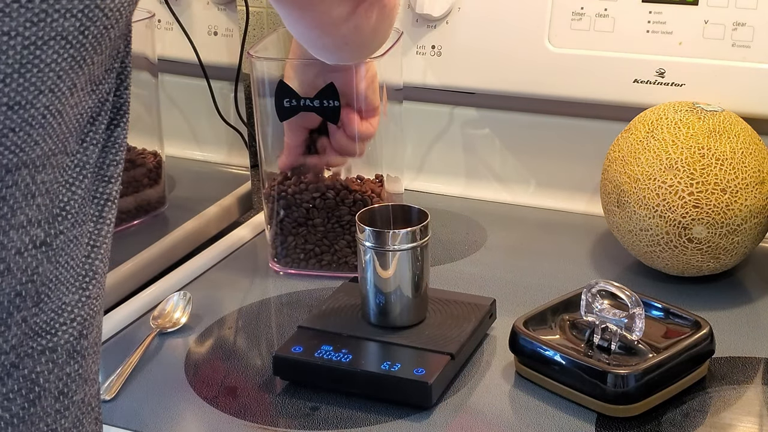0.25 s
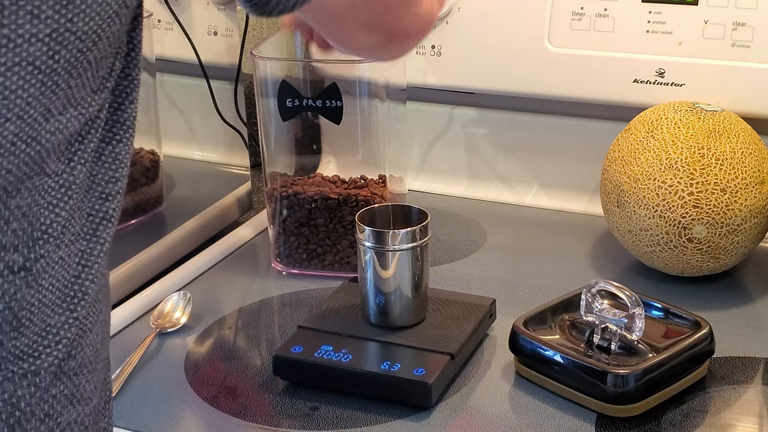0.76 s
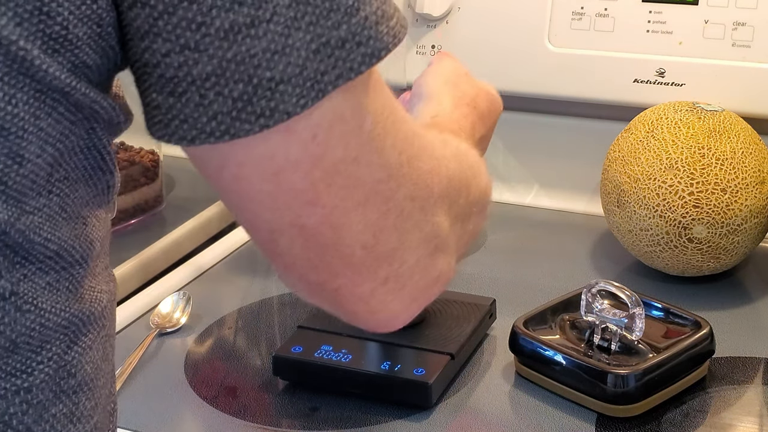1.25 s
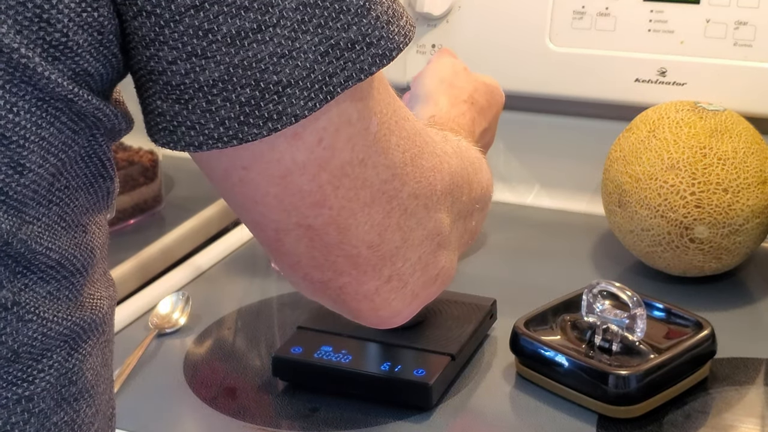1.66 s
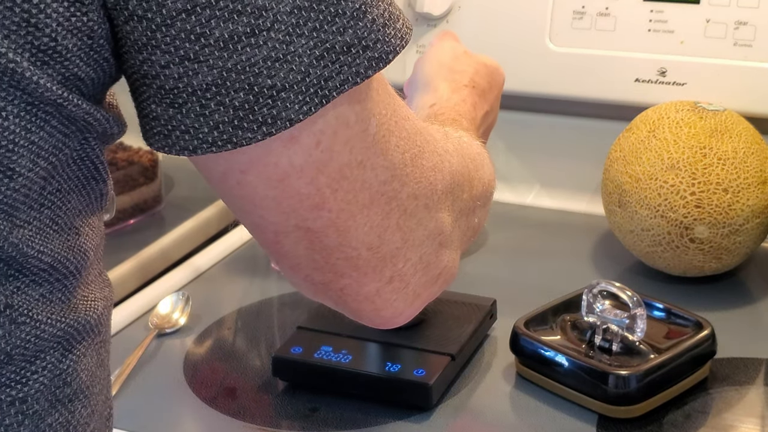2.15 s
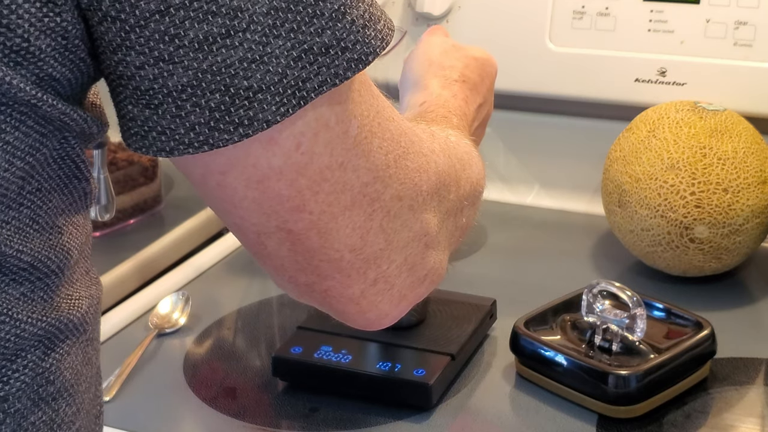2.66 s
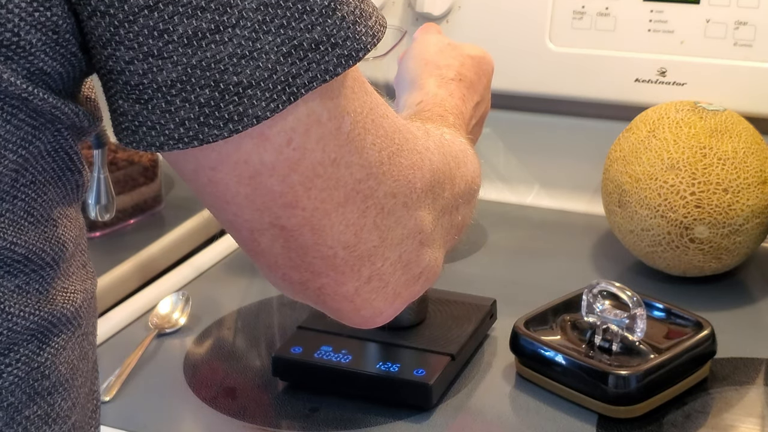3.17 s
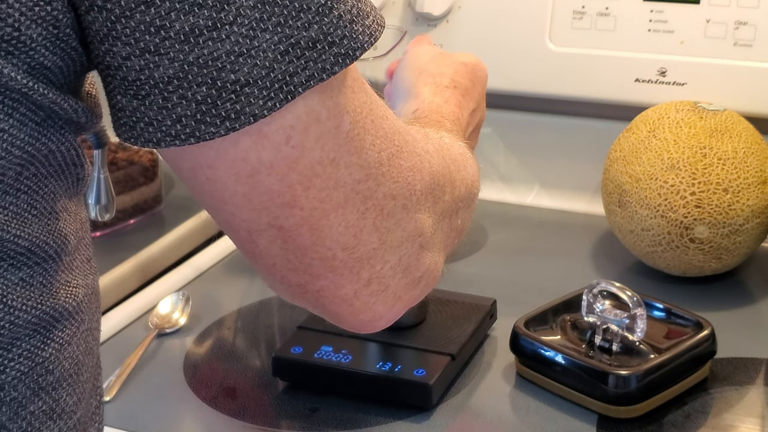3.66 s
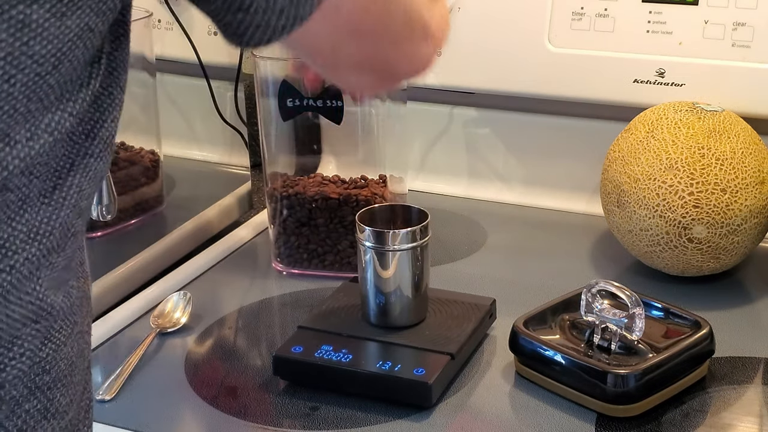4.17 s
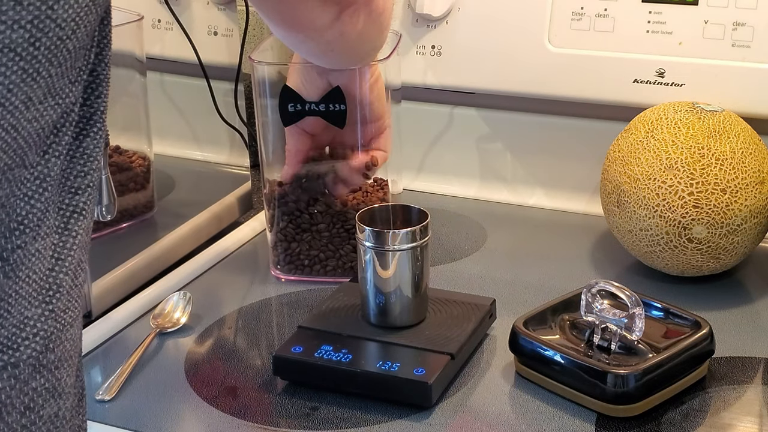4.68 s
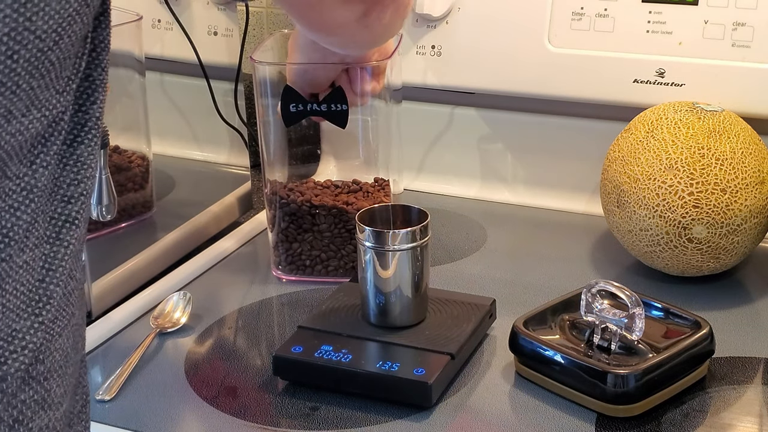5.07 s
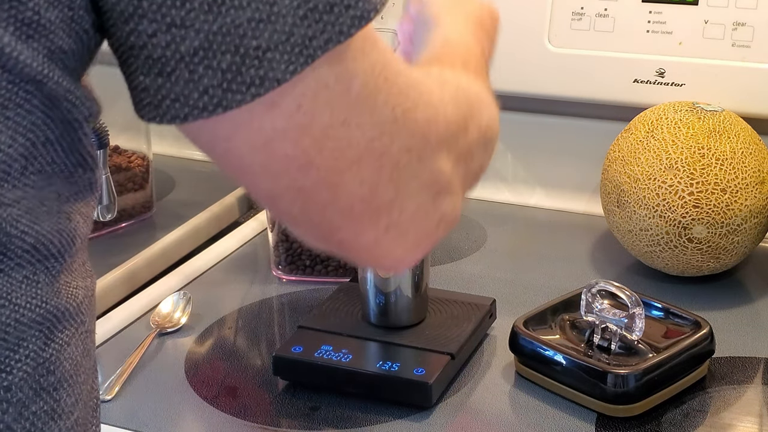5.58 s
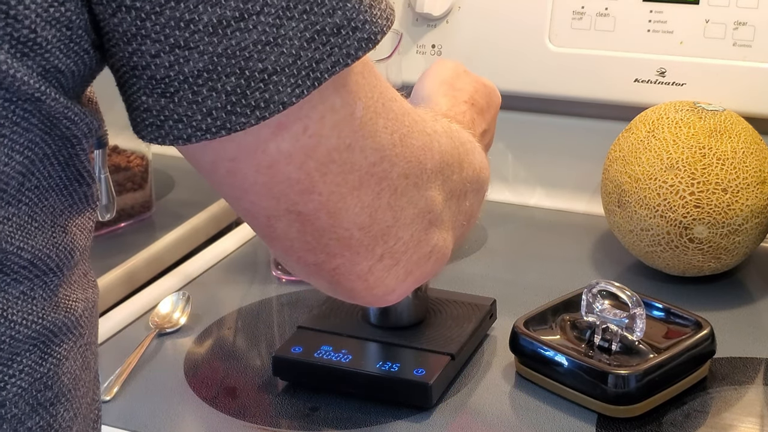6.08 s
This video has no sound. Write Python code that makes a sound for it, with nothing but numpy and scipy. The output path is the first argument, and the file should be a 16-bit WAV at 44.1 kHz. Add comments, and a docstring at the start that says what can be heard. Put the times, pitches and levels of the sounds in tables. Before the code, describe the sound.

Coffee beans are scooped with a crackly rustle, dropped rattling into a metal cup, then scooped again, above a steady low appliance hum.

```python
"""Coffee beans from jar to cup

A hand digs beans out of a plastic jar (dense random contacts) and lets them trickle into a steel cup,
where each ticks and bounces (noise cracks, rebounds, ringing modes).
Going back for more it bumps the jar, digs again and drops a last few beans.
The small hard kitchen answers every contact with noise tails; an appliance hums over the room's rush."""
import sys
import numpy as np
from scipy import signal
from scipy.fft import rfft, irfft, next_fast_len
from scipy.io import wavfile
from scipy.ndimage import uniform_filter1d, map_coordinates

SR = 44100
rng = np.random.default_rng(int(sys.argv[2]) if len(sys.argv) > 2 else 0)


def to_wav(s):
    """Save 16-bit WAV."""
    ch = np.atleast_2d(s).T  # columns
    pcm = np.round(np.clip(ch, -1, 1) * 32767)  # PCM
    wavfile.write(sys.argv[1], SR, pcm.astype(np.int16))


N = 279153  # length in samples


def amp(db):
    """Decibels to gain."""
    return 10 ** (np.asarray(db) / 20)


def unit(x):
    """Scaled to rms 1."""
    return x / np.sqrt(np.mean(x ** 2) + 1e-20)


def unit_energy(x):
    """Each row scaled to energy 1."""
    return x / np.sqrt(np.sum(x ** 2, axis=-1, keepdims=True) + 1e-20)


def along(points, hz):
    """(Hz, value) points read on a log frequency axis."""
    f, v = np.transpose(points)
    return np.interp(np.log(hz + 1), np.log(f + 1), v)


def envelope(strokes, top_db, grows):
    """Gain of a voice that follows the effort of several strokes, silent between them."""
    t = np.arange(N) / SR
    gain = np.zeros(N)
    for rows in strokes:
        effort_db = np.interp(t, *np.transpose(rows))
        active = (t >= rows[0][0]) & (t <= rows[-1][0])
        gain += amp(top_db + grows * effort_db) * active
    return gain


def wobble(rate):
    """A smooth random curve, rate knots a second."""
    knots = rng.standard_normal(int(N * rate / SR) + 4)
    return map_coordinates(knots, [np.arange(N) * rate / SR])


def filtered(x, gain):
    """x times a gain that depends on frequency."""
    m = next_fast_len(N + SR // 2)
    return irfft(rfft(x, m) * gain(np.fft.rfftfreq(m, 1 / SR)), m)[..., :N]


def above(x, hz, order=3):
    """x without its lows."""
    return signal.sosfilt(signal.butter(order, hz, "highpass", fs=SR, output="sos"), x)


def through(x, response):
    """Each channel of x convolved with an impulse response."""
    response = response.reshape((1,) * (x.ndim - 1) + (-1,))
    return signal.oaconvolve(x, response, axes=-1)[..., :N]


def colour(x, spectrum, size=4096):
    """x through a causal, minimum-phase filter of energy 1 with this spectrum."""
    cepstrum = irfft(np.log(amp(along(spectrum, np.fft.rfftfreq(size, 1 / SR)))))
    fold = np.r_[1, np.full(size // 2 - 1, 2), np.zeros(size // 2)]
    response = irfft(np.exp(rfft(cepstrum * fold)))
    return through(x, unit_energy(response))


def ring(x, modes):
    """The decaying sine modes that x excites; their dB are energies."""
    t = np.arange(SR // 2) / SR
    response = np.zeros(len(t))
    for hz, db, t60 in modes:
        decaying = np.sin(2 * np.pi * hz * t) / 1000 ** (t / t60)
        response += amp(db) * unit_energy(decaying)
    return through(x, response)


def contacts(times, gains, t60, size=384):
    """A tiny decaying noise crack, with its own random colour, at each time."""
    k = np.arange(size)
    decay = np.exp(-np.log(1000) * k / SR / t60)
    cracks = unit_energy(rng.standard_normal((len(times), size)) * decay)
    at = np.maximum(times * SR, 0).astype(int)[:, None] + k
    return np.bincount(at.ravel(), (cracks * gains[:, None]).ravel(), N)[:N]


def series(starts, lengths, rate, scatter_db, count=10):
    """Times and sizes of contacts that follow each start at an uneven rate for its length."""
    k = np.arange(count)
    chance = rng.uniform(-1, 1, (len(starts), 2, count)) * (k > 0)
    times = starts[:, None] + (k + .4 * chance[:, 0]) / rate
    # the last contact of a run may be a fraction of full size
    running = np.clip(np.maximum(lengths, 0)[:, None] * rate + 1 - k, 0, 1)
    return times, running * amp(scatter_db * chance[:, 1])


def bounces(times, flight, keep, count=6):
    """Times and sizes of each landing and its uneven rebounds, which tend to weaken."""
    hops = flight * rng.uniform(.25, 1.75, (len(times), count))
    fading = np.clip(keep, 0, 1).reshape(-1, 1) ** np.arange(count)
    sizes = fading * amp(2 * rng.standard_normal(hops.shape))
    hops[:, 0], sizes[:, 0] = 0, 1
    return times[:, None] + np.cumsum(hops, axis=1), unit_energy(sizes)


def grains(rate, spread_db, t60):
    """Dense bean-on-bean contacts of uneven size in little slips, rms 1 over any longer stretch."""
    count = int(rate * N / SR)
    chance = rng.random((count, 2))
    times = (np.arange(count) + 2 * chance[:, 0]) / rate
    slips = amp(1.64 * wobble(70))
    x = contacts(times, amp(-spread_db * np.sqrt(chance[:, 1])), t60) * slips
    return x / np.sqrt(np.abs(uniform_filter1d(x ** 2, SR // 20)) + 1e-12)


# Stereo width of diffuse sound: pitch_hz [Hz], side_over_mid_db [dB]
WIDTH = [(150, -12), (300, -11), (600, -4), (1200, -0.5), (6800, 0.5), (7800, -12.5), (16000, -13.5)]


def stereo(mid, side):
    """Left and right of a diffuse sound, its width set by frequency."""
    side = filtered(side, lambda hz: amp(along(WIDTH, hz)))
    return np.array([mid + side, mid - side])


# How long the room rings on: pitch_hz [Hz], t60_s [s]
KITCHEN_DECAY = [(100, 0.61), (500, 0.2), (1500, 0.33), (4000, 0.33), (9000, 0.26), (16000, 0.21)]


def kitchen(x, wet_db, gap=0.00014, count=3):
    """Direct sound, then the dense answer of counter, stove and walls, which differs from spot to spot."""
    noise = rng.standard_normal((2 * count, SR // 3))
    hz, t, z = signal.stft(noise, SR, nperseg=256)
    decay = np.exp(-np.log(1000) * t / along(KITCHEN_DECAY, hz)[:, None])
    tails = signal.istft(z * decay, SR, nperseg=256)[1]
    onset = 1 - np.exp(-np.arange(tails.shape[1]) / SR / gap)
    tails = unit_energy(tails * onset)
    spot = np.arange(N) // (SR // 50) % count  # the spots take turns, 20 ms each
    mid, side = (sum(through(x * (spot == k), tail) for k, tail in enumerate(group))
                 for group in np.split(tails, 2))
    return (x + amp(wet_db) * stereo(mid, side)) / np.hypot(1, amp(wet_db))


# Spectrum of the room's rush: pitch_hz [Hz], relative_level_db [dB per Hz]
RUSH_SPECTRUM = [(22, -9.5), (55, 1.5), (90, -2.5), (160, 0), (240, -5), (310, 0), (410, -4), (600, -15),
                 (900, -23.5), (1500, -37), (4000, -40), (6000, -49), (8200, -38), (10000, -46.5)]
RUSH_DB = -59.5  # rms of the rush's mid signal above 230 Hz
# Wavering main hum, two stretches joined up: time_s [s], level_db [dB, before a 1.5 dB lift]
HUM_LEVEL = [
    [(0.0, -50), (0.75, -50.5), (0.94, -63), (0.96, -54), (3.79, -53.5), (3.82, -57), (4.27, -52.5)],
    [(4.46, -53.5), (4.782, -60), (4.824, -49.5), (5.642, -56.5), (5.662, -66), (5.866, -52), (6.33, -50)],
]
HUM_HZ = 189.7
# Weaker hum tones: pitch_hz [Hz], level_db [dB rms]
HUM_LINES = [(59.3, -60), (119, -77.5), (584, -73)]


def tone(hz, waver):
    """A sine whose level and phase waver at random, rms 1."""
    t = np.arange(N) / SR
    drift = 1 + waver * (wobble(14) + 1j * wobble(21))
    return unit(np.real(np.exp(2j * np.pi * hz * t) * drift))


def background():
    """A wavering appliance hum of four tones, one main and three weaker, over a rush of shaped noise."""
    t = np.arange(N) / SR
    air = filtered(rng.standard_normal((2, N)), lambda hz: amp(along(RUSH_SPECTRUM, hz)))
    air = air * amp(RUSH_DB) / np.std(filtered(air[0], lambda hz: hz > 230))
    level_db = np.interp(t, *np.concatenate(HUM_LEVEL).T) + 1.5
    main_hum = amp(level_db) * tone(HUM_HZ, waver=.35)
    weaker_hum = sum(amp(db) * tone(hz, waver=0.25) for hz, db in HUM_LINES)
    return stereo(*air) + main_hum + weaker_hum


# Beans and skin rubbing softly: start_s [s], length_s [s], relative_level_db [dB]
RUBS = [(1.396, 0.14, -66), (1.78, .09, -68), (2.51, 0.046, -67), (2.825, 0.14, -66), (4.324, .005, -48),
        (5.826, 0.018, -55.5)]
RUB_RISE_DB_PER_S, RUB_FALL_DB_PER_S = 273, 402
# Crunch of rubbed beans, here and in the jar: pitch_hz [Hz], relative_level_db [dB per Hz]
CRUNCH = [(400, -14), (900, -0.5), (1350, 1.5), (1700, -1.5), (2500, 0.5), (3300, -0.5), (5000, -1.5),
          (6700, -3.5), (7400, -7), (9000, -47)]
# Their bright crackle, here and in the jar: pitch_hz [Hz], relative_level_db [dB per Hz]
CRACKLE = [(5000, -20.5), (7400, -4.5), (8500, 1.5), (11000, 3), (12500, 4), (14300, 4), (16000, 1.5)]


def hand():
    """Fine, quiet friction of the moving hand: each rub swells, holds and fades."""
    t = np.arange(N) / SR
    strokes = np.zeros(N)
    for start, length, db in RUBS:
        rise_db = RUB_RISE_DB_PER_S * np.maximum(start - t, 0)
        fall_db = RUB_FALL_DB_PER_S * np.maximum(t - start - length, 0)
        strokes += amp(db - rise_db - fall_db)
    friction = grains(rate=2000, spread_db=18, t60=.003)
    rub = kitchen(friction * strokes, wet_db=13)
    return amp(-15.5) * colour(rub, CRUNCH) + amp(-5) * colour(rub, CRACKLE)


# The hand bumping the jar: start_s [s], chatter_length_s [s], relative_level_db [dB]
BUMPS = [(4.299, 0.0048, -8.5), (4.315, 0.035, -1.5), (4.409, 0.0056, -9)]
CHATTER_PER_S, CHATTER_SCATTER_DB = 96, 1
# The jar rocking on the counter: pitch_hz [Hz], relative_energy_db [dB], t60_s [s]
THUD = [(62, -16, 0.35), (115, -20, 0.2), (185, -7, .2), (312, -15, .15), (400, -12, .07),
        (513.6, -1, 0.22), (640, -12, 0.12)]
# Rattle of the knock: pitch_hz [Hz], relative_level_db [dB per Hz]
KNOCK = [(30, -20), (100, -0.5), (250, -6.5), (550, 0), (750, -7), (1500, -22.5), (4000, -28.5),
         (10000, -43)]


def bump():
    """A soft stuttering knock rings the hollow jar's low modes; harder blows rattle it far more."""
    start, length, db = np.transpose(BUMPS)
    times, sizes = series(start, length, CHATTER_PER_S, CHATTER_SCATTER_DB)
    gains = amp(db)[:, None] * sizes
    blows = np.bincount((times * SR).astype(int).ravel(), gains.ravel(), N)
    rattle = kitchen(blows ** 2, wet_db=9.5)  # squaring favours the hard blows
    return amp(-10) * ring(blows, THUD) + amp(-6) * colour(rattle, KNOCK)


# How hard the hand digs, one stroke per handful: time_s [s], effort_db [dB]
EFFORT = [
    [(0, -37.5), (.034, -13.5), (.16, -7), (.204, 0.5), (.25, -11.5), (.40, -9), (.46, -27), (.62, -34.5),
     (.75, -50)],
    [(4.51, -45), (4.538, -14.5), (4.62, -13), (4.672, 0), (4.77, -14), (4.88, -12), (4.96, -10),
     (5.12, -36), (5.25, -75)],
]
# Digging voices: relative dB at 0 dB effort, dB gained per dB of effort
DIG_CRUNCH, DIG_CRACKLE, DIG_BODY = (-32, 1.0), (-33, 1.174), (-43, 0.52)
# Single beans snapping past each other or falling back:
# start_s [s], relative_energy_db [dB], dull_part_db [dB relative to the bright part]
SNAPS = [(0.374, -5.5, -2.5), (0.494, -18, -2.5), (0.544, -21, -5), (0.803, -30.5, -9.5), (0.867, -25, 0),
         (0.9198, -28, 1), (4.5233, -28, 8), (4.79, -9.5, -6), (4.9506, -10, -9.5), (5.104, -24.5, -5.5),
         (5.355, -26, -12)]
SNAP_BODY_DB = -5.5  # drumming on the plastic, relative to a snap's dull part, before the mix
# Drumming of the plastic: pitch_hz [Hz], relative_level_db [dB per Hz]
JAR_BODY = [(100, -11), (250, -12), (350, -0.5), (600, 1.5), (780, -7.5), (1000, -10.5), (1800, -26.5)]
# Resonances of the jar and the air in it: pitch_hz [Hz], relative_energy_db [dB], t60_s [s]
JAR_MODES = [(456, -19, .2), (512, -15, .3), (1341, -20, .2), (1957, -21, .2), (2231, -20, .3),
             (2466, -18, .45), (2822, -21, .35), (2930, -20, .6), (2990, -20, .6), (3232, -18, .3)]


def jar():
    """Fingers churn the beans in little slips; the same contacts crunch, crackle and drum on the plastic."""
    churn = grains(rate=750, spread_db=21.0, t60=0.0023)
    crunch, crackle, body = (churn * envelope(EFFORT, *voice) for voice in (DIG_CRUNCH, DIG_CRACKLE, DIG_BODY))
    start, db, dull_db = np.transpose(SNAPS)
    times, sizes = bounces(start, flight=0.0068, keep=0.63, count=3)

    def snaps(level_db):
        """The snapping beans and their rebounds at these levels."""
        gains = amp(level_db)[:, None] * sizes
        return contacts(times.ravel(), gains.ravel(), t60=0.011)

    crunch = kitchen(crunch + snaps(db + dull_db), wet_db=7)
    crackle = kitchen(crackle + snaps(db), wet_db=7.5)
    body = kitchen(body + snaps(db + dull_db + SNAP_BODY_DB), wet_db=1.5)
    beans = amp(-2.0) * colour(crunch, CRUNCH) + amp(3.0) * colour(crackle, CRACKLE)
    plastic = amp(1.5) * colour(body, JAR_BODY) + amp(-10.0) * ring(crunch, JAR_MODES)
    return beans + plastic


# Each time the fingers let beans go into the cup:
# start_s [s], trickle_length_s [s], relative_energy_per_bean_db [dB], clack_db [dB relative to the tick]
POURS = [(1.542, 0.0074, -12.5, -13), (1.606, 0.011, -11.5, -8.5), (1.627, 0.075, -12, -7),
         (1.873, 0.022, -20.5, -11), (1.915, 0.0018, -7, -7.5), (1.942, 0.025, -4.5, -10.5),
         (1.977, 0.015, -6, -10.5), (2.051, 0.027, -8.5, -6.5), (2.089, 0.048, -7.5, -8.5),
         (2.149, 0.041, -9.5, -7.5), (2.243, 0, -11.5, -1), (2.303, 0.011, -14.5, -1.5),
         (2.567, 0.023, -14, -1), (2.603, 0.093, -10.5, -6.5), (2.742, 0.029, -12, -0.5),
         (2.964, 0.0079, -18, -5), (3.021, 0.027, -20, 0.5), (3.12, 0.0014, -11.5, 0.5),
         (3.186, 0.021, -12.5, -3), (3.637, 0.014, -20.5, 2), (3.675, 0, -13.5, 3),
         (5.907, 0.0015, -16.5, -4.5), (5.955, 0.0034, -17.5, 1.5), (6.107, 0.035, -19.5, 1),
         (6.146, .052, -13.5, -4.5), (6.292, 0, -13, -4)]
BEANS_PER_S, BEAN_SCATTER_DB = 58, 7  # how fast a trickle runs, and how much its beans differ
# Bright tick of a bean in the cup: pitch_hz [Hz], relative_level_db [dB per Hz]
TICK = [(2800, -69), (5300, -18), (7500, -15.5), (9500, -6), (12000, -4), (14000, -0.5), (16000, -3.5)]
# Its duller clack: pitch_hz [Hz], relative_level_db [dB per Hz]
CLACK = [(300, -1), (700, -11.5), (1050, -2.5), (1500, -13.5), (2350, -16.5), (2900, -8), (3600, -2),
         (4600, 1.5), (5300, -6), (6400, -2), (7600, -12), (10000, -13)]
# Resonances of the steel cup, three hollow ones first: pitch_hz [Hz], relative_energy_db [dB], t60_s [s]
CUP_MODES = [(1025, -13, .11), (1230, -23, .06), (2960, -19, .06), (3820, -32, .12), (4600, -22, .05),
             (4750, -18, .12), (4860, -20, .08), (9138, -20, .25), (13325, -27, .15)]
# The cup's bottom gets covered from the first to the second time: time_s [s]
FILLING_S = [2.15, 3.8]
MUFFLE_DB = 5  # how much the wall's ring loses by then
WALL_CUT_HZ = 4800  # mainly the tick's part above this drives the wall's ring


def cup():
    """Beans trickle from the fingers; each ticks, clacks and bounces in the ringing steel cup."""
    start, length, db, clack_db = np.transpose(POURS)
    landings, weights = series(start, length, BEANS_PER_S, BEAN_SCATTER_DB)
    db, clack_db = (np.repeat(column, landings.shape[1]) for column in (db, clack_db))
    # the harder the pour, the longer its beans' rattle keeps up
    keep = np.interp(db, [-17, -5], [.76, .88])
    times, sizes = bounces(landings.ravel(), flight=.005, keep=keep)
    blows = (amp(db) * weights.ravel())[:, None] * sizes
    clack_blows = blows * amp(clack_db)[:, None]
    tick = kitchen(contacts(times.ravel(), blows.ravel(), t60=0.0032), wet_db=4.0)
    clack = kitchen(contacts(times.ravel(), clack_blows.ravel(), t60=0.01), wet_db=0.5)
    # as the beans pile up they muffle the wall's bright ring and sound the low hollow modes more
    fill = np.interp(np.arange(N) / SR, FILLING_S, [0, 1])
    hollow = ring(clack * amp(-8.5 + 1.2 * fill), CUP_MODES[:3])
    wall = ring(above(tick, WALL_CUT_HZ) * amp(-1.5 - MUFFLE_DB * fill), CUP_MODES[3:])
    return amp(-2) * colour(tick, TICK) + amp(-9) * colour(clack, CLACK) + hollow + wall


def scene():
    """The work on the counter lies a little to the right, over the background."""
    work = hand() + bump() + jar() + cup()
    return background() + work * amp([[-.5], [.5]])  # left and right dB


TOP_HZ = 15800


def record(dry):
    """A steep band limit: almost nothing passes above TOP_HZ."""
    return filtered(dry, lambda hz: 1 / np.sqrt(1 + (hz / TOP_HZ) ** 400))


dry = scene()
out = record(dry)
to_wav(out)
```